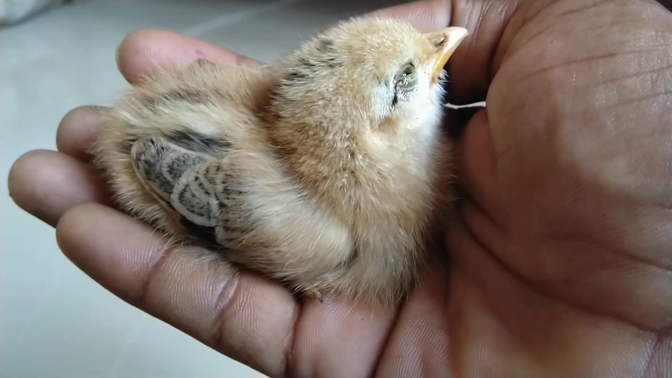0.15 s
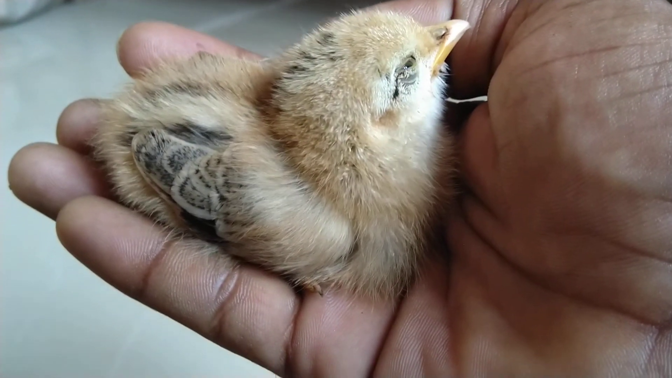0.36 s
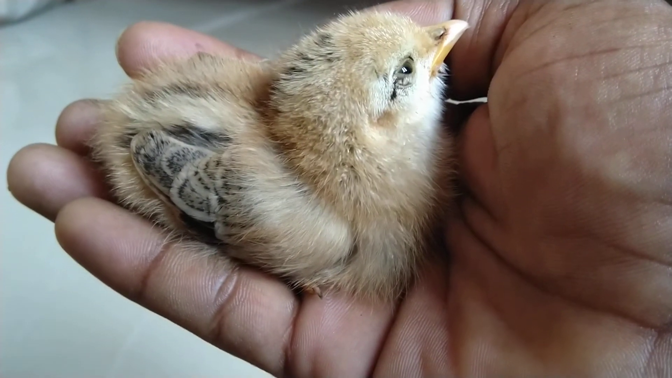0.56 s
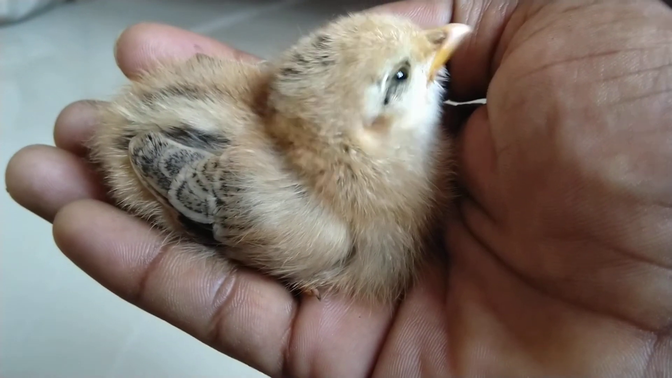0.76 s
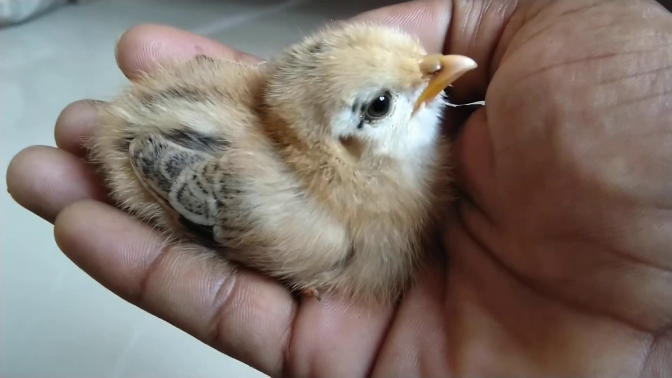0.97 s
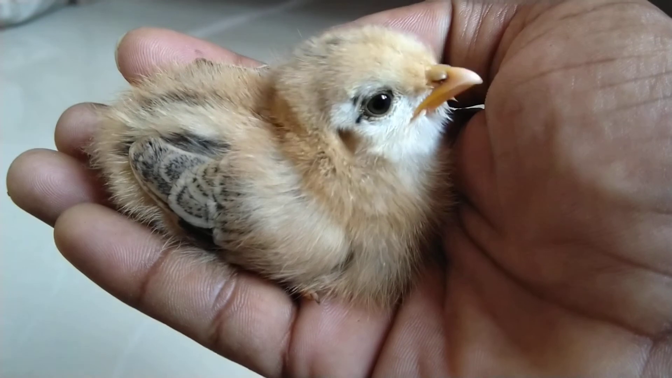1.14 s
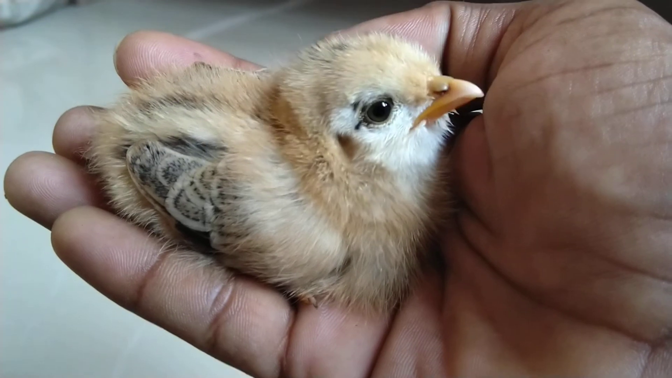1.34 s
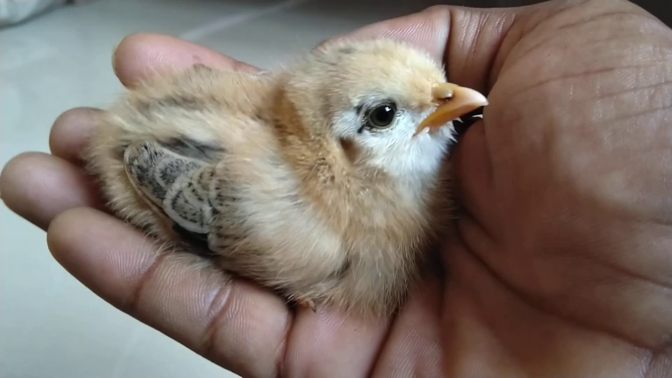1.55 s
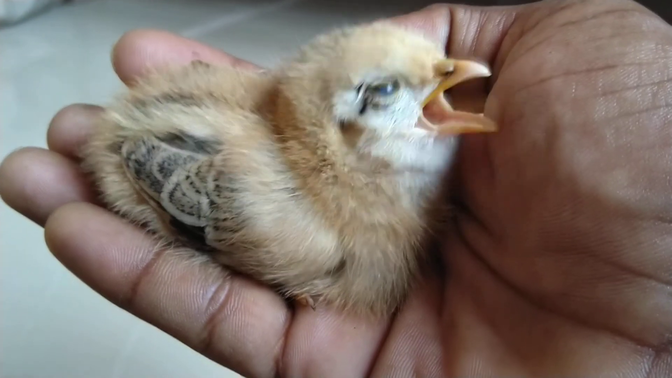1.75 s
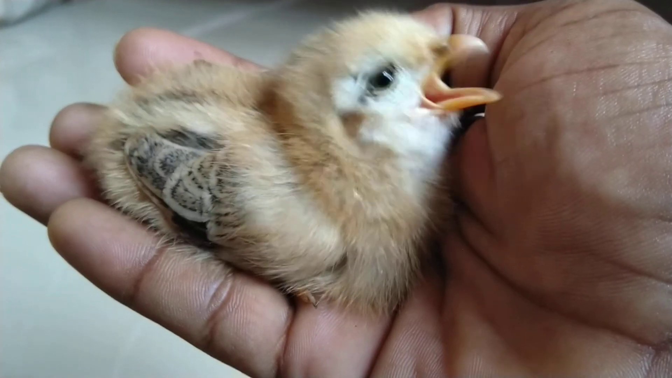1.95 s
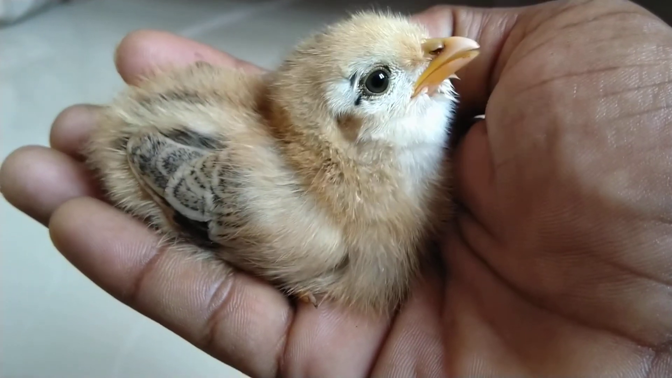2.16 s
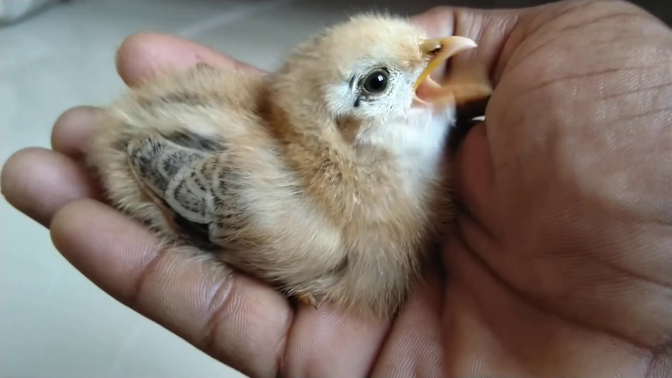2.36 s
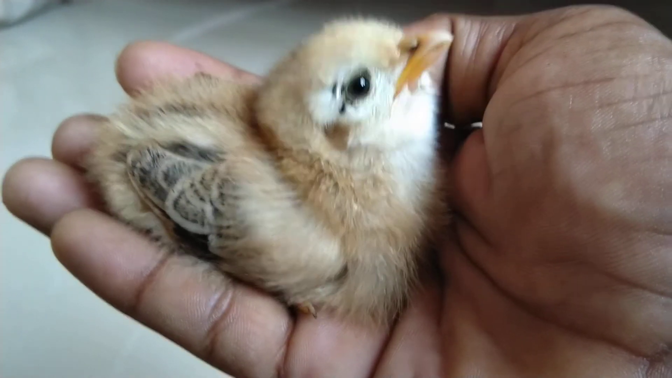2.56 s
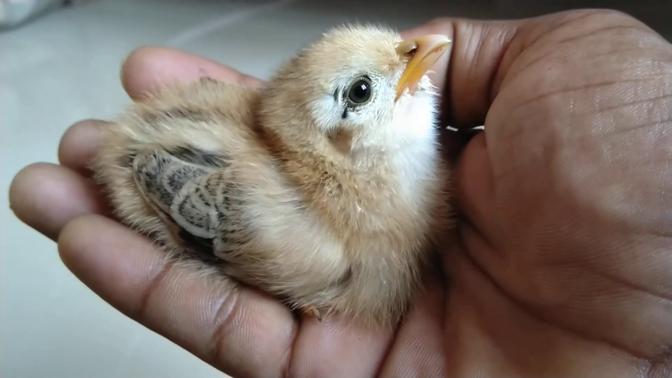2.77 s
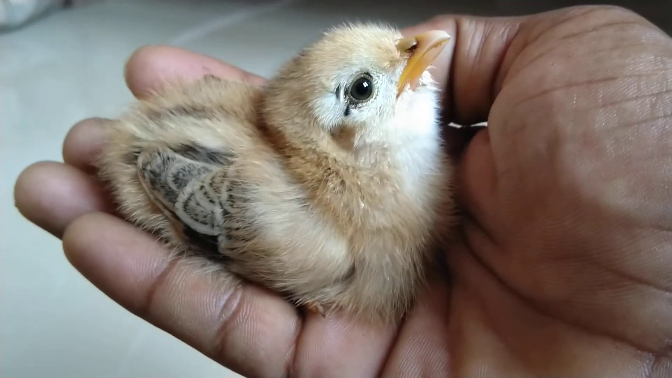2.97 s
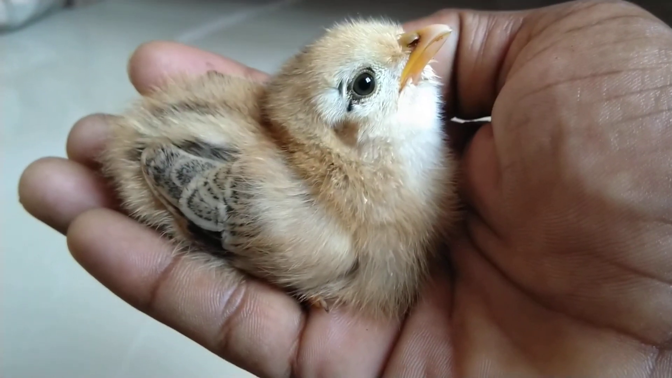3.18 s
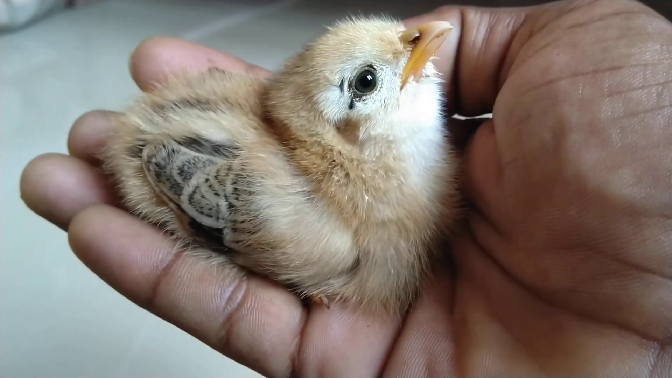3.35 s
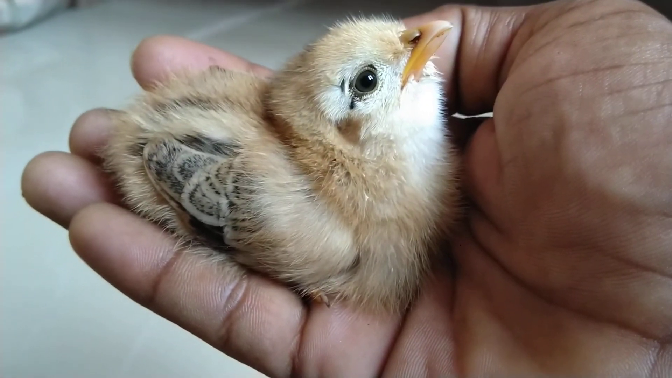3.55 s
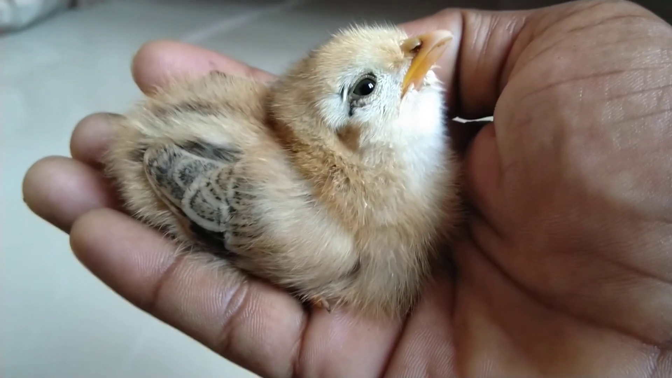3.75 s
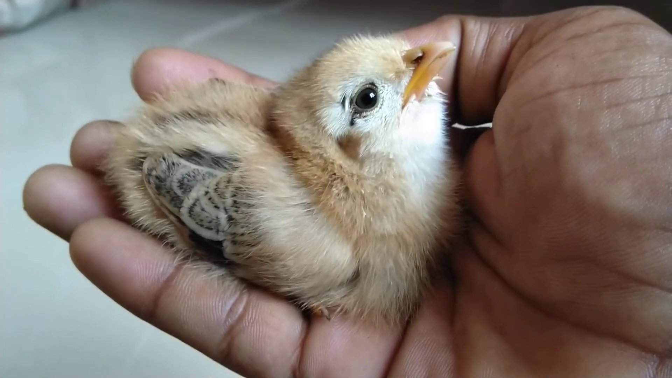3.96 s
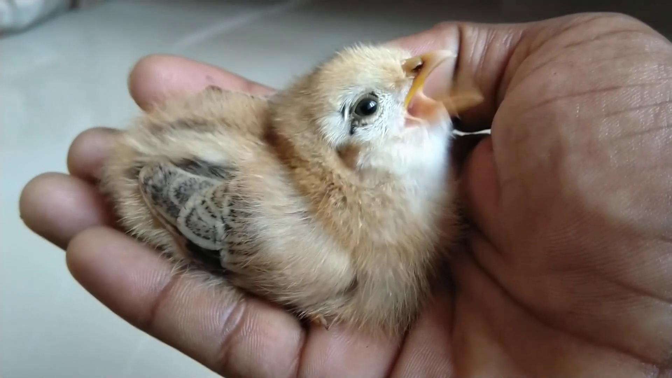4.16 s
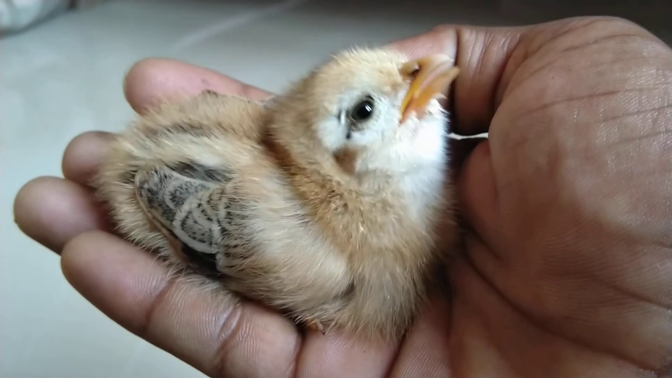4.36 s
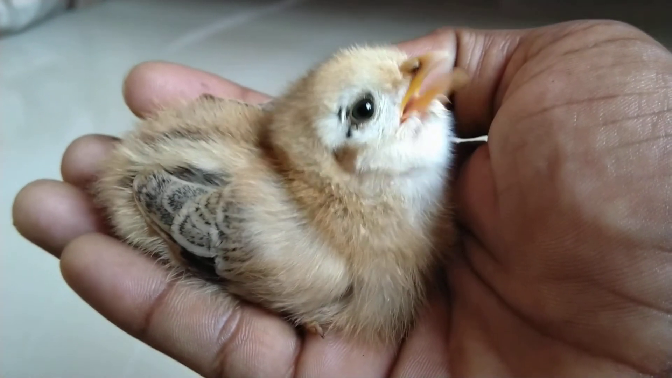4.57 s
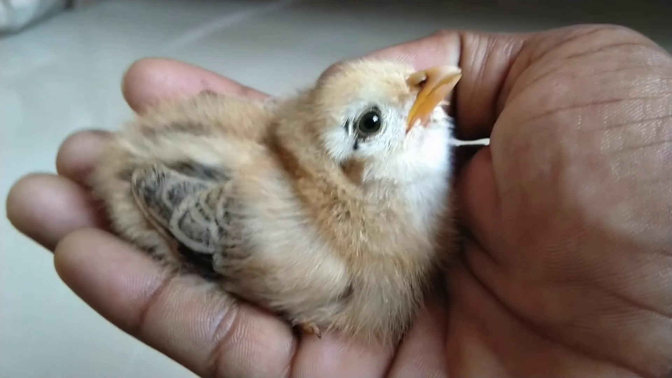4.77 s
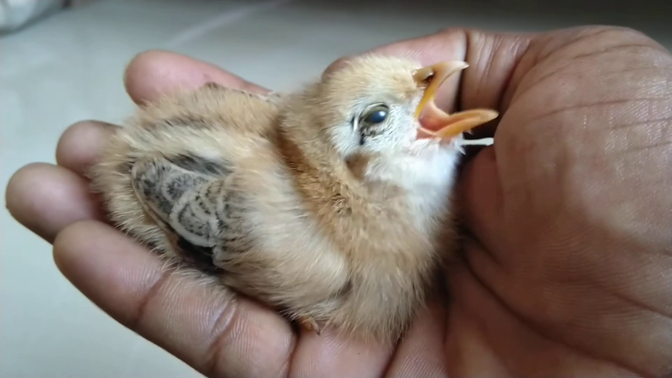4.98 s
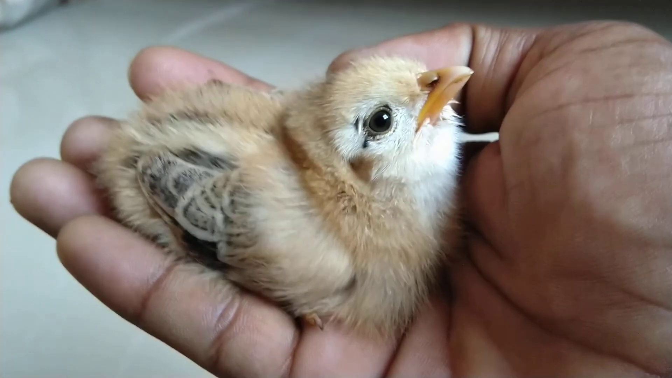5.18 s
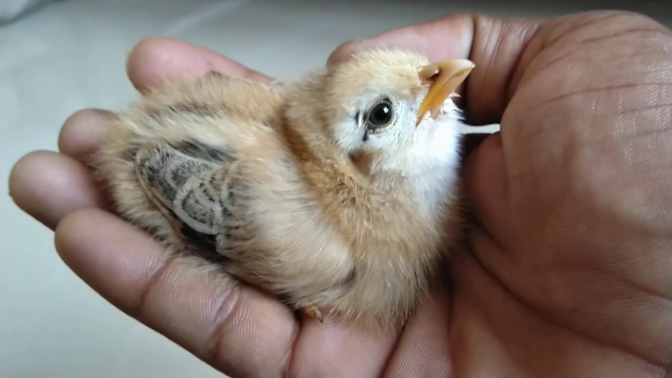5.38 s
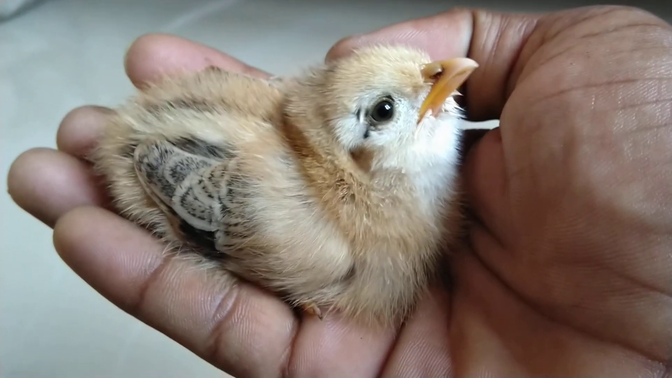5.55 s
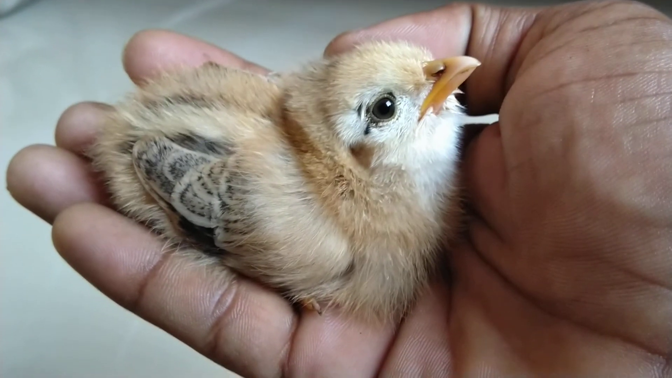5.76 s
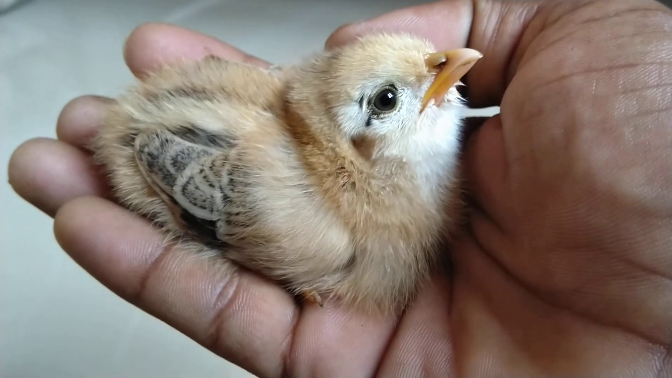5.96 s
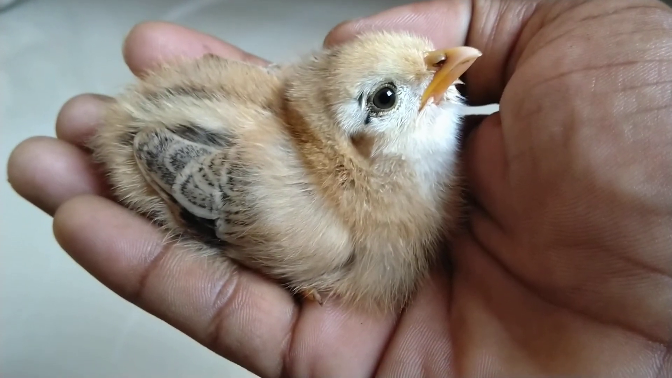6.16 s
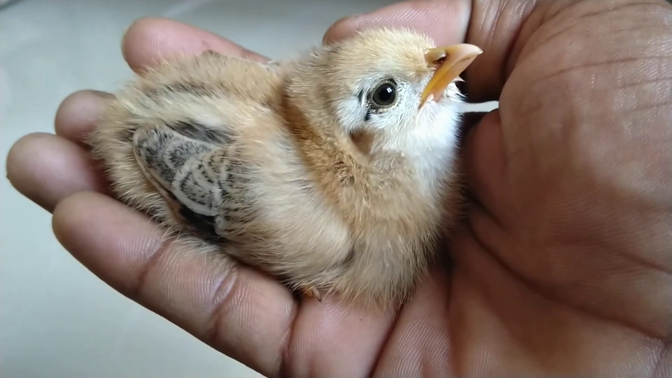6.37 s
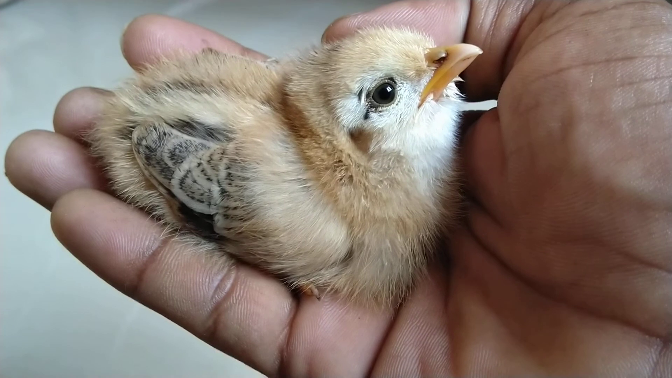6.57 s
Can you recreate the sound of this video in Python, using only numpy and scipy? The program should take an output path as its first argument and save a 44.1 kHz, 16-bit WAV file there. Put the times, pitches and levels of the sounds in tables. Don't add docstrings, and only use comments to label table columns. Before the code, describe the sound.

A chick cupped in a hand, very close to a small stereo microphone, stays quiet at first over soft air hiss, faint traffic hum and feather rustle. Then come three sharp falling whistles, a pause with faint dull knocks, and three more. Each drops suddenly to a lower register, and a hard bare room swells up behind it and rings on. A faint bird chirps outside at the end.

```python
import sys
import numpy as np
from scipy import signal
from scipy.fft import rfft, irfft, next_fast_len
from scipy.io import wavfile
from scipy.ndimage import uniform_filter1d, minimum_filter1d, map_coordinates

SR = 44100
rng = np.random.default_rng(int(sys.argv[2]) if len(sys.argv) > 2 else 0)


def materialize(psi):
    bounded = np.clip(np.atleast_2d(psi).T, -1, 1)
    quanta = np.round(bounded * 32767).astype(np.int16)
    wavfile.write(sys.argv[1], SR, quanta)


def ratio_of_db(decibels):
    return 10 ** (np.asarray(decibels, float) / 20)


N = 291942


def unit(x):
    return x / np.sqrt(np.mean(x ** 2) + 1e-20)


def along(points, hz):
    f, *cols = np.transpose(points)
    return np.squeeze([np.interp(np.log(hz + 1), np.log(f + 1), c) for c in cols])


def curves(rows, t, smooth_s):
    s, *cols = np.transpose(rows)
    size = int(smooth_s * SR) + 1
    return uniform_filter1d([np.interp(t, s, c) for c in cols], size, axis=1, mode="nearest")


def wobble(rate, size):
    knots = rng.standard_normal(int(size * rate / SR) + 4)
    return map_coordinates(knots, [np.arange(size) * rate / SR], order=2)


def filtered(x, response):
    m = next_fast_len(x.shape[-1] + 8192)
    return irfft(rfft(x, m) * response(np.fft.rfftfreq(m, 1 / SR)), m)[..., :x.shape[-1]]


def rush(spectrum, patchy_db):
    # f/Hz, side minus mid level/dB
    width = [(60, -24.5), (110, -26), (200, -25.5), (380, -6.5), (700, -1.5), (1290, -0.5), (2380, 0.5),
             (4400, 0), (8120, 1), (15000, -0.5)]
    z = signal.stft(rng.standard_normal((2, N + 512)).astype(np.float32), nperseg=512)[2]
    field = uniform_filter1d(rng.standard_normal(z.shape[1:]), 5, axis=0)
    field = uniform_filter1d(field, 14, axis=1)
    patches = ratio_of_db(patchy_db * unit(field)).astype(np.float32)
    pair = signal.istft(z * patches, nperseg=512)[1][:, :N]

    def mid_and_side(hz):
        angle = np.arctan(ratio_of_db(along(width, hz)))
        return ratio_of_db(along(spectrum, hz)) * [np.cos(angle), np.sin(angle)]

    mid, side = filtered(pair, mid_and_side)
    return unit(np.array([mid + side, mid - side]))


def band(lo_hz, hi_hz):
    return [(lo_hz * .75, -60), (lo_hz, 0), (hi_hz, 0), (hi_hz * 1.3, -60)]


def swells(rows):
    s, half, *cols = np.transpose(rows)[:, :, None]
    return np.exp(-((np.arange(N) / SR - s) / half) ** 2).astype(np.float32), *cols


def drone(hz, width_hz):
    turn = np.exp(2j * np.pi * np.cumsum(hz) / SR)
    a, b = [(wobble(width_hz, size=N) + 1j * wobble(width_hz, size=N)) * turn for _ in range(2)]
    return unit(np.real([a + .5 * b, a - .5 * b]))


def background():
    # f/Hz, level per Hz/dB
    air_colour = [(15, -45.5), (25, -22), (59, 0), (86, -10), (123, -4.5), (261, -12), (324, -12),
                  (391, -18), (979, -17), (1430, -22.5), (2200, -25.5), (2520, -22.5), (4090, -21.5),
                  (9690, -33), (15700, -36.5)]
    # t/s, half length/s, level/dB, f/Hz
    vehicles = [(.2, .06, -68.5, 770), (.4, 0.14, -57, 941), (.59, 0.051, -56.5, 749),
                (.8, 0.042, -69, 830), (.99, 0.15, -51.5, 846), (1.55, .2, -67, 749),
                (2.92, 0.12, -63, 868), (3.36, 0.11, -67.5, 865), (3.81, 0.076, -59.5, 886),
                (5.2, .12, -58.5, 888), (5.47, 0.057, -62, 821), (5.98, 0.13, -61, 823),
                (6.4, 0.17, -63.5, 885)]
    # t/s, half length/s, level/dB
    tyre_swells = [(.9, 0.17, -71.5), (1.32, 0.28, -68), (2.3, .5, -72.5), (5.2, .06, -66.5),
                   (5.5, 0.17, -63.5), (5.75, 0.14, -75.5), (6.3, .4, -66.5)]
    # t/s, half length/s, level/dB
    thud_swells = [
        (1.6, 0.1, -69),
        (2.0, .1, -65.5),
        (3.6, 0.084, -80),
        (4.6, .15, -56),
    ]
    # t/s, half length/s, body level/dB, hiss level/dB
    feathers = [
        (.16, .04, -71, -86.5),
        (.88, .1, -70, -67),
        (1.12, .13, -63, -71.5),
        (1.42, .08, -63.5, -80.5),
        (1.62, .05, -69.5, -67),
        (3.58, .03, -90.5, -72),
        (4.05, .12, -90, -75.5),
    ]
    rest_db, rest_hz = -72.5, 813
    shape, db, hz = swells(vehicles)
    passing = ratio_of_db(rest_db) + np.sum(shape * ratio_of_db(db), axis=0)
    drone_hz = (ratio_of_db(rest_db) * rest_hz + np.sum(shape * ratio_of_db(db) * hz, axis=0)) / passing
    shape, db = swells(tyre_swells)
    tyres = ratio_of_db(-86) + np.sum(shape * ratio_of_db(db), axis=0)
    shape, db = swells(thud_swells)
    thuds = ratio_of_db(-74 + 0.5 * wobble(5.5, size=N)) + np.sum(shape * ratio_of_db(db), axis=0)
    shape, body_db, hiss_db = swells(feathers)
    body_level = np.sum(shape * ratio_of_db(body_db + 3.5), axis=0)
    hiss_level = np.sum(shape * ratio_of_db(hiss_db + 2.0), axis=0) * ratio_of_db(3 * wobble(21, size=N))

    air = ratio_of_db(-60.0) * rush(air_colour, patchy_db=0.97)
    blur = passing * ratio_of_db(-5) * rush(band(680, 1000), patchy_db=3.5)
    tone = passing * ratio_of_db(-12.0) * drone(drone_hz, width_hz=57)
    upper = tyres * ratio_of_db(-1.5) * rush(band(1100, 1600), patchy_db=2.5)
    rumble = thuds * ratio_of_db(-1) * rush(band(26, 53), patchy_db=-3.5)
    body = body_level * rush(band(2700, 6800), patchy_db=2)
    hiss = hiss_level * rush(band(12500, 17000), patchy_db=2.5)
    return air + blur + tone + upper + rumble + body + hiss


def melody(start, length, top_hz, break_hz, break_s, bow_hz):
    # t/s, f/Hz
    scoop = [(0, 4150), (.004, 4450)]
    # t after the break/s, f/Hz
    landing = [(.006, 3880), (.013, 3540)]
    # t before the end/s, f/Hz
    ending = [(.035, 3350), (.015, 3030), (.006, 2780), (0, 2560)]
    rise_hz_per_s, crown_s = 32000, .005
    top_s = scoop[-1][0] + (top_hz - scoop[-1][1]) / rise_hz_per_s
    halfway = ((top_s + crown_s + break_s) / 2, (top_hz + break_hz) / 2 + bow_hz)
    high = scoop + [(top_s, top_hz), (top_s + crown_s, top_hz), halfway, (break_s, break_hz)]
    low = [(break_s + s, hz) for s, hz in landing] + [(length - s, hz) for s, hz in ending]
    return [(start + s, hz) for s, hz in high + low]


def notch(hz, centre_hz, width_hz, db):
    return 1 - (1 - ratio_of_db(np.minimum(db, 0))) * np.exp(-((hz - centre_hz) / width_hz) ** 2)


def peep(rows, level_db, cupped, right_high_db, right_low_db, push_db,
         null_hz, null_db, lead_above, lead_below):
    # multiple of the pitch, level in the high register/dB, in the low register/dB
    overtones = [(2, -21.5, -16), (3, -39, -25), (4, -56, -28.5), (5, -60, -44), (6, -60, -50.5)]
    # f/Hz, level/dB
    throat = [(5000, 7.5), (6200, -2), (7000, 0.5), (7800, 2), (9000, -21), (10400, -7), (12000, -16),
              (13800, -3.5), (16000, -6.5)]
    hand_hz = [2600, 3000, 3200, 3370, 3520, 4300, 4650, 5200]
    # left port/dB, right port/dB
    hand_db = [(-5, -7), (-6.5, -4.5), (1, -10.5), (8, 6), (-3.5, -10.5), (-10.5, -11), (0.5, -3),
               (0.5, -4.5)]
    # f/Hz, width/Hz, left level/dB, right level/dB
    break_null = (3617, 49.5, -21, -14)
    attack_s, release_s, turn_width_hz, null_width_hz = .005, .004, 60, 60

    t = np.arange(round(rows[0][0] * SR), round(rows[-1][0] * SR)) / SR
    hz, = curves(rows, t, smooth_s=.004)
    hz = hz - 100 * np.exp((t - t[-1]) / .004)
    cycle = 2 * np.pi * np.cumsum(hz * (1 + .002 * wobble(300, size=len(t)))) / SR
    edges = np.sqrt(2) * np.clip(np.minimum(t - t[0], t[-1] - t) / .0015, 0, 1)
    breath = np.clip((t - t[0]) / attack_s, 0, 1) * np.clip((t[-1] - t) / release_s, 0, 1)

    sides = np.array([[.5], [-.5]])
    left_db, right_db = cupped * along(np.column_stack([hand_hz, hand_db]), hz)
    right_db = right_db + along([(4100, right_low_db), (4900, right_high_db)], hz)
    push = push_db * np.clip((4200 - hz) / 500, 0, 1)
    ports = breath * ratio_of_db(level_db + push + np.array([left_db, right_db]))
    lead = lead_below + (lead_above - lead_below) / (1 + np.exp((null_hz - hz) / turn_width_hz))
    clash_hz, clash_width_hz, *clash_db = break_null
    clash = notch(hz, clash_hz, clash_width_hz, cupped * np.array(clash_db)[:, None])
    echo = [notch(hz, null_hz, null_width_hz, null_db), np.ones_like(hz)]
    cancelling = clash * echo
    effort = uniform_filter1d(np.sqrt(np.mean(ports ** 2, axis=0)), int(0.06 * SR), mode="nearest")
    flutter = np.array([wobble(120, size=len(t)) for _ in sides])
    near = ports * cancelling * ratio_of_db(2.98 * flutter) * np.sin(cycle + sides * lead)
    out = effort * np.sin(cycle)

    low = 1 / (1 + np.exp((hz - 4100) / 120))
    past_top = (hz.max() > 4900) * (t > t[hz.argmax()])
    about_to_drop = past_top * (1 - low) / (1 + np.exp((hz - 4580) / 60))
    early_tone = np.sin(2 * np.pi * 3420 * t + sides * 2.8)
    near = near + ratio_of_db(-10.0) * effort * about_to_drop * early_tone

    shimmer = ratio_of_db(2.5 * flutter[::-1])
    fading = np.clip((t[-1] - t) / 0.024, 0, 1)
    leap_hz_per_s = np.gradient(uniform_filter1d(hz, size=90)) * SR
    steady = 1 / (1 + (leap_hz_per_s / 50000) ** 4)
    for k, high_db, low_db in overtones:
        k = round(k)
        gain = effort * ratio_of_db(high_db + low * (low_db - high_db) + along(throat, k * hz))
        gain = gain * np.clip((SR / 2.6 - k * hz) / 800, 0, 1)
        gain = gain * fading ** (k - 2) * breath * steady
        near = near + gain * shimmer * np.sin(k * cycle + sides * (1.9 + 0.6 * k * lead))
        out = out + gain * np.sin(k * cycle)
    return edges * near, edges * out


def room(x, level_db, low_lead, high_lead, low_pan_db, high_pan_db, alike):
    # f/Hz, time to fall by 60 dB/s
    ring_times = [(2000, 0.52), (3400, 0.76), (5000, 0.96), (7000, 0.58), (10000, 0.57), (14000, 0.71)]
    # f/Hz, level/dB
    walls = [(2400, -9.5), (3000, -5.5), (3400, -0.5), (3900, 0.5), (4400, 4.5), (5000, -0.5), (6000, 3),
             (7000, 6), (8500, 15), (10400, 8), (12000, 0), (13800, 1)]
    # f/Hz, width/Hz, level/dB
    ringing = [(3369, 74, -2), (4860, 27, -1.5)]
    hz, t, z = signal.stft(rng.standard_normal((3, int(1.3 * SR))), SR, nperseg=256)
    build = 1 - np.exp(-np.maximum(t - .025, 0) / 0.037)
    decay = ratio_of_db(along(walls, hz)[:, None] - 60 * t / along(ring_times, hz)[:, None])
    tails = signal.istft(z * build * decay, SR, nperseg=256)[1]
    m = next_fast_len(len(x) + tails.shape[1] + 4096)
    f = np.fft.rfftfreq(m, 1 / SR)
    held = 1 + sum(ratio_of_db(db) * 1j * f * w / (c * c - f * f + 1j * f * w) for c, w, db in ringing)
    wet = held * rfft(x, m) * rfft(tails / np.linalg.norm(tails[0]), m)
    sides = np.array([[.5], [-.5]])
    lead = along([(4100, low_lead), (4700, high_lead), (6200, high_lead), (9000, -2.5)], f)
    pan_db = along([(4100, low_pan_db), (4700, high_pan_db), (7500, high_pan_db), (9000, 0.007)], f)
    alike = np.clip(alike, 0, 1)
    shared = np.sqrt(alike) * wet[0] * np.exp(1j * sides * lead)
    both = shared + np.sqrt(1 - alike) * wet[1:]
    return irfft(both * ratio_of_db(level_db + sides * pan_db), m)[:, :m - 4096]


def chick():
    # t/s, f/Hz
    first_peep = [
        (1.716, 4550),
        (1.726, 4850),
        (1.745, 4200),
        (1.758, 4305),
        (1.771, 3996),
        (1.784, 4100),
        (1.809, 3620),
        (1.82, 3210),
        (1.846, 2502),
    ]
    # t/s, length/s, top f/Hz, register break f/Hz, break after start/s
    full_peeps = [
        (1.967, .13, 5110, 4480, .061),
        (2.393, .151, 5160, 4410, .087),
        (4.195, .141, 5040, 4400, .064),
        (4.466, .145, 5125, 4650, .069),
        (4.967, .147, 5265, 4610, .085),
    ]
    bow = [-90, 95, 110, -20, 90]
    # level/dB, share of the hand's colour (0-1),
    # right port high register/dB, right port low register/dB, push in the low register/dB
    head_rows = [(-9.5, 0.64, -2.5, -2.5, 2.7), (-8, 1, -6, -1, -0.3), (-9.5, 1, -2.2, -2, 0),
                 (-8, 0.98, -9.5, 1.5, 0.4), (-11, 0.92, 4.3, 3.5, -0.9), (-10.5, .99, -3.8, -1.05, .3)]
    nulls = [4400, 4480, 4840, 5030, 4860, 4850]
    # depth/dB, left port's lead above the pitch/rad, below it/rad
    finger_rows = [(-2, 5, 2.4), (-13, 2.44, 2.1), (-26, 1.57, 2.3), (-20, -1.3, 2.8), (-20, 1.27, 2.48),
                   (-15.5, -0.37, 2.75)]
    # level/dB, low lead/rad, high lead/rad,
    # low left-right/dB, high left-right/dB
    turn_rows = [(-10.5, -1, -10.5, -4.5, 0), (-7.5, -1.5, 6.5, 1.5, 3), (-6, 1.42, -1.63, -3, -2.5),
                 (-8.5, -8.5, -1.5, -1, -0.5), (-7, -7.5, -10.5, 3, 5.5), (-4.5, -2.5, -5.5, 0, 6)]
    likeness = [.4, .01, 1, 1, .01, 0.88]
    out = np.zeros((2, N + 2 * SR))
    calls = [first_peep] + [melody(*p, bow_hz) for p, bow_hz in zip(full_peeps, bow)]
    settings = zip(calls, head_rows, nulls, finger_rows, turn_rows, likeness)
    for rows, head, null_hz, fingers, turn, alike in settings:
        near, leaving = peep(rows, *head, null_hz, *fingers)
        wet = room(leaving, *turn, alike)
        start = round(rows[0][0] * SR)
        out[:, start:start + near.shape[1]] += near
        out[:, start:start + wet.shape[1]] += wet
    return out[:, :N]


def cracks():
    # t/s, peak level/dB, left-right/dB
    catches = [
        (1.717, -39, -5),
        (1.9737, -35, 6),
        (2.4047, -35, -2),
        (2.4224, -18.5, 7),
        (4.2035, -38, -1),
        (4.4862, -20, 9),
        (4.9697, -74, -6),
    ]
    colour = [(1500, -38.0), (3000, -14.5), (5500, 16.5), (7000, -14.5), (10000, -32.5), (16000, -51)]
    out, t = np.zeros((2, N)), np.arange(SR // 50) / SR
    for s, db, pan_db in catches:
        burst = ratio_of_db(db + 6 - 60 * t / 0.012) * rng.standard_normal((2, len(t)))
        start = round(s * SR)
        out[:, start:start + len(t)] += burst * ratio_of_db([[pan_db / 2], [-pan_db / 2]])
    return filtered(out, lambda hz: ratio_of_db(along(colour, hz)))


def taps():
    # t/s, peak level/dB, f/Hz, time to fall by 60 dB/s
    knocks = [
        (3.28, -53, 390, 0.087),
        (3.47, -55.5, 317, 0.089),
        (3.739, -47, 326, 0.038),
        (6.012, -53.5, 374, 0.18),
        (6.165, -44.5, 388, 0.04),
    ]
    out, t = np.zeros(N + SR), np.arange(SR // 4) / SR
    for s, db, hz, t60 in knocks:
        attack = 1 - np.exp(-t / 0.0013)
        out[round(s * SR):][:len(t)] += ratio_of_db(db - 60 * t / t60) * np.sin(2 * np.pi * hz * t) * attack
    return out[:N]


def far_bird():
    # t/s, f/Hz, level/dB
    chirp = [
        (6.345, 4150, -95),
        (6.36, 3693, -63),
        (6.39, 3600, -64.5),
        (6.42, 3880, -58),
        (6.45, 3630, -66.5),
        (6.47, 3700, -86),
    ]
    hz, db = curves(chirp, np.arange(N) / SR, smooth_s=0.0081)
    tone = ratio_of_db(db) * (db > -89) * np.sin(2 * np.pi * np.cumsum(hz) / SR)
    echoes = rng.standard_normal((2, SR // 5)) * ratio_of_db(-60 * np.arange(SR // 5) / SR / 0.21)
    return signal.fftconvolve(tone[None], echoes / np.linalg.norm(echoes[0]), axes=1)[:, :N]


def scene():
    return background() + chick() + cracks() + taps() + far_bird()


def limited(x):
    need = np.minimum(1, .99 / (np.abs(x).max(axis=0) + 1e-9))
    return x * uniform_filter1d(minimum_filter1d(need, size=265), size=133)


def masked(x, margin_db, up_db, starved_db, down_db):
    hz, _, z = signal.stft([x[0] + x[1], x[0] - x[1]], SR, nperseg=1024)
    edges = np.geomspace(1200, 16500, 27)
    member = (np.digitize(hz, edges) == np.arange(1, len(edges))[:, None]) * 1.
    power = member @ np.abs(z) ** 2
    octaves = np.log2(edges[1:, None] / edges[1:])
    above = ratio_of_db(-margin_db - up_db * octaves) ** 2 * (octaves > 0) @ power.sum(axis=0)
    spent = np.roll(uniform_filter1d(power.sum(axis=0), size=9, axis=1), 12, axis=1)
    below = ratio_of_db(-starved_db + down_db * octaves) ** 2 * (octaves < 0) @ spent
    over_db = 10 * np.log10((power + 1e-20) / (np.abs(above + below) + 1e-20))
    lost = 1 / (1 + np.exp(np.clip(over_db / 1.2, -30, 30)))
    mid, side = signal.istft(z * (1 - member.T @ lost), SR, nperseg=1024)[1][:, :N]
    return np.array([mid + side, mid - side]) / 2


def top_cut(x):
    return signal.sosfilt(signal.butter(12, 15890, fs=SR, output="sos"), x)


def record(dry):
    bend = ratio_of_db(-29.5) * filtered(dry ** 2, lambda hz: hz ** 2 / (hz ** 2 + 200 ** 2))
    stored = masked(limited(dry + bend), margin_db=32.5, up_db=23, starved_db=62.0, down_db=10)
    mix = filtered(stored, lambda hz: hz < 15900)
    return top_cut(mix)


dry = scene()
out = record(dry)
materialize(out)
```